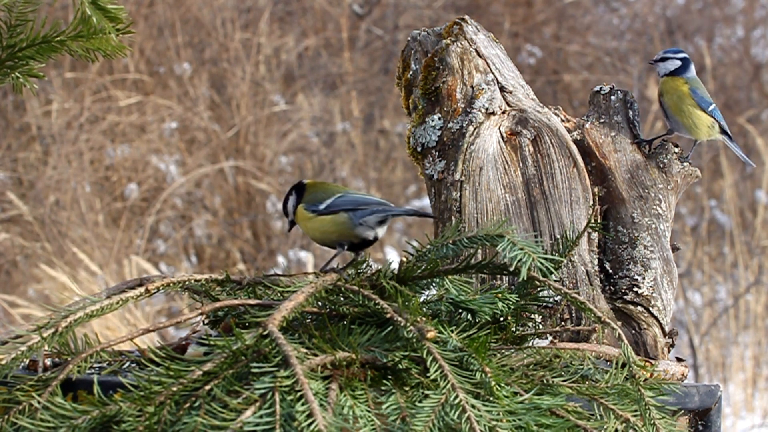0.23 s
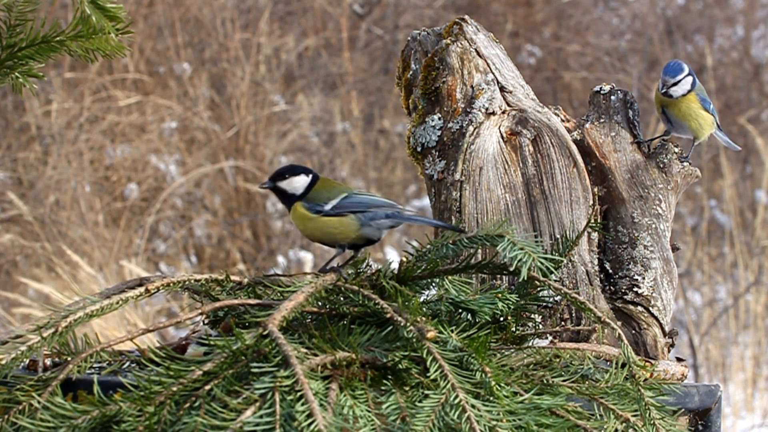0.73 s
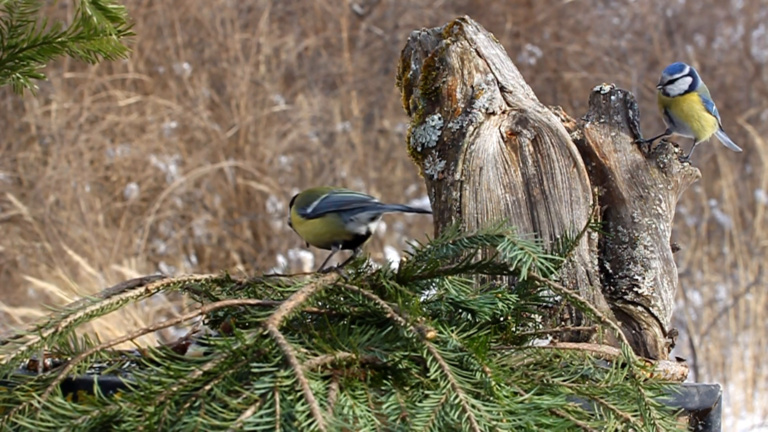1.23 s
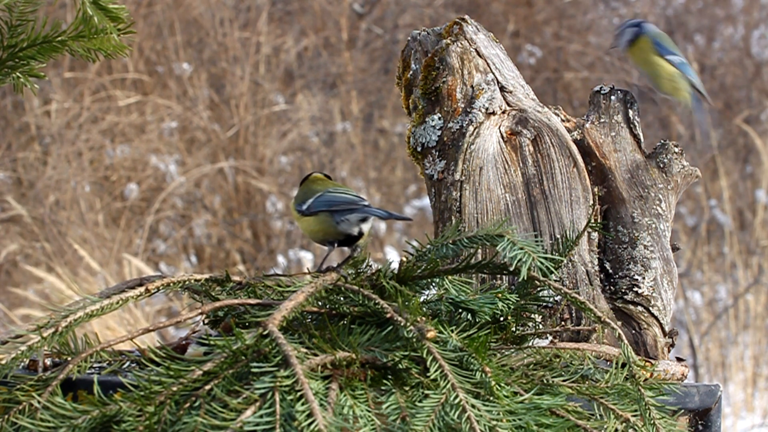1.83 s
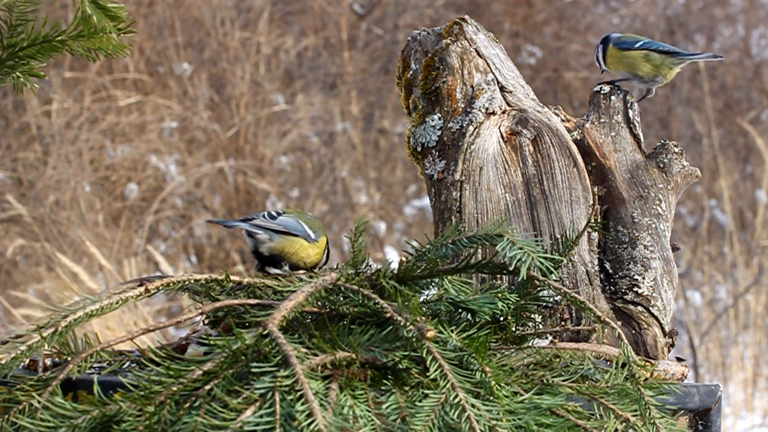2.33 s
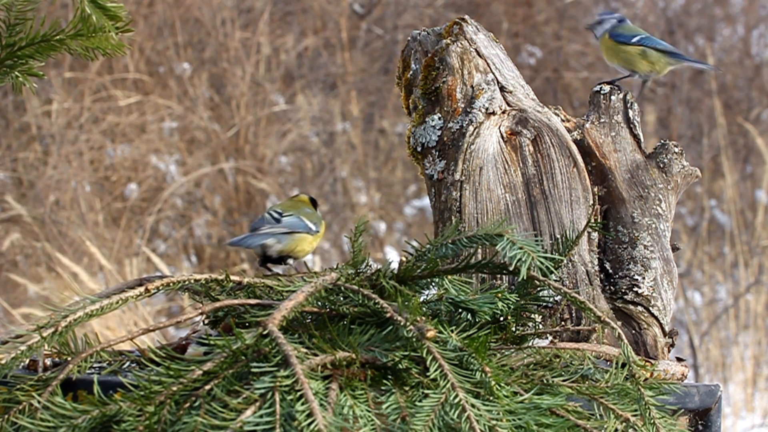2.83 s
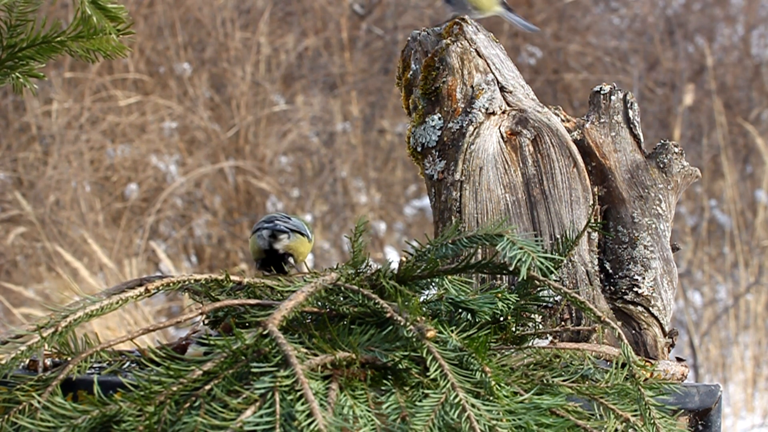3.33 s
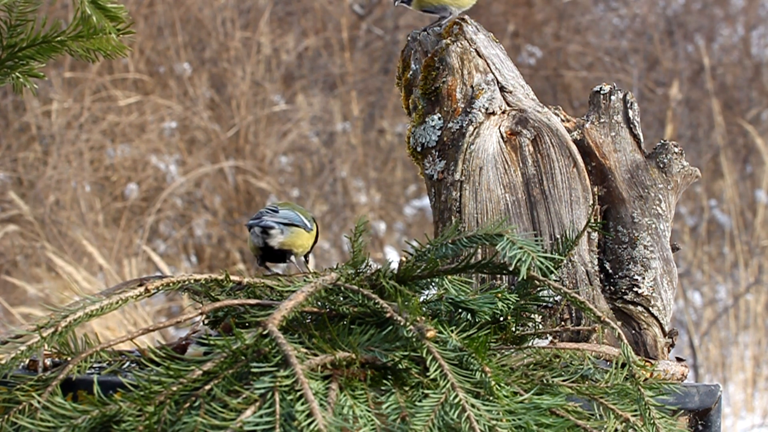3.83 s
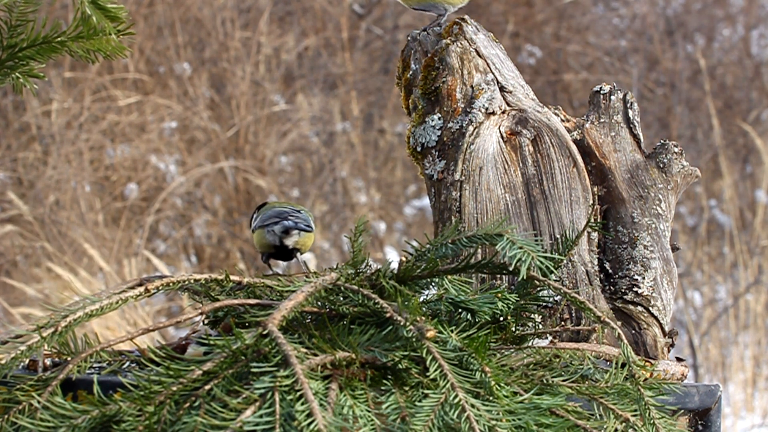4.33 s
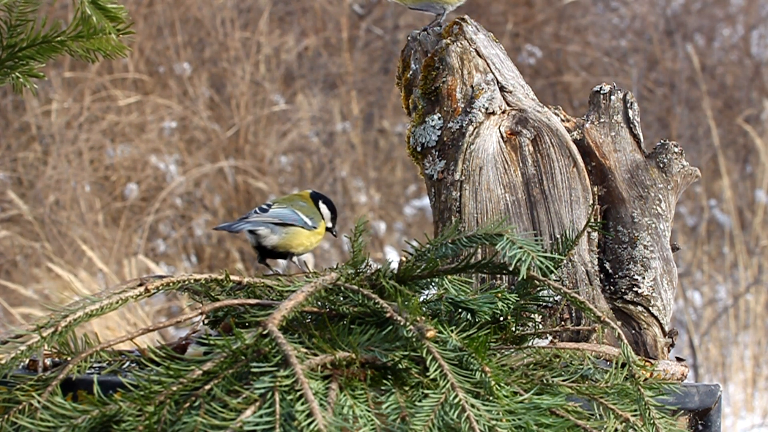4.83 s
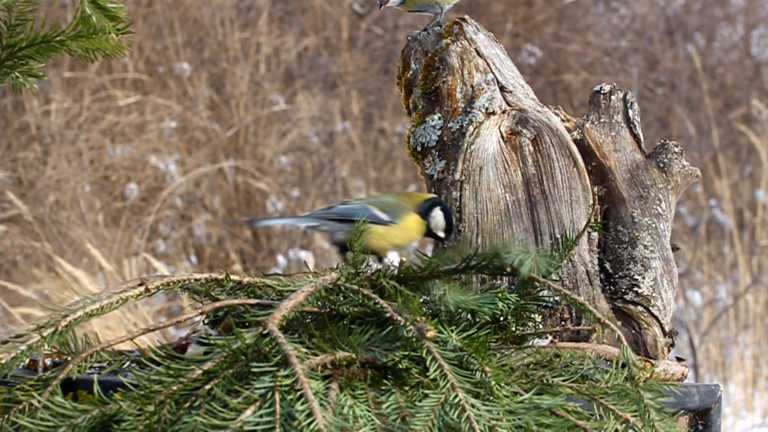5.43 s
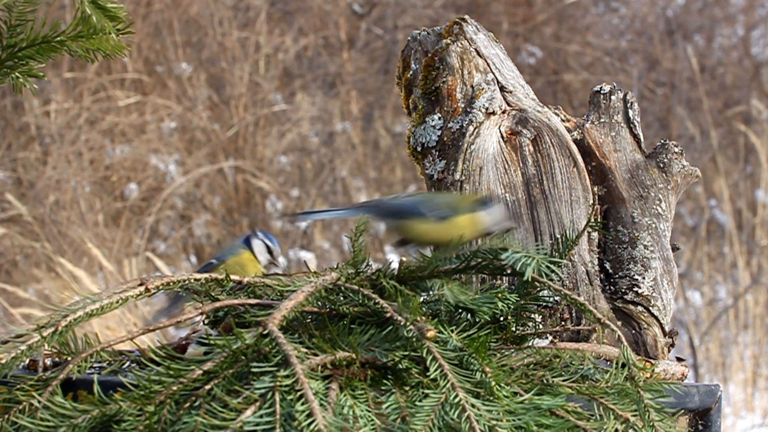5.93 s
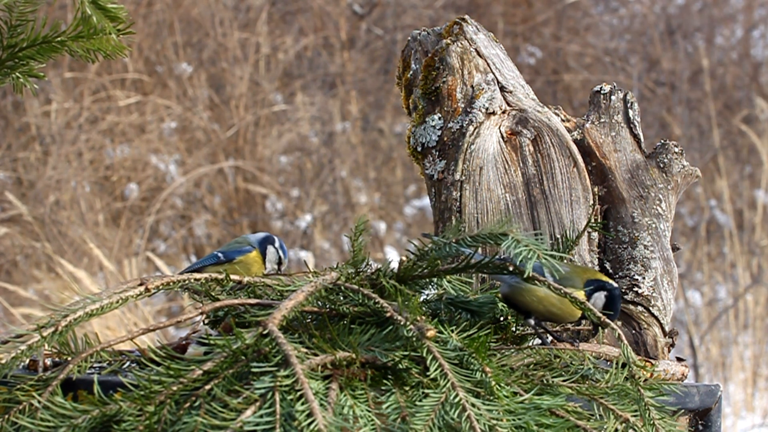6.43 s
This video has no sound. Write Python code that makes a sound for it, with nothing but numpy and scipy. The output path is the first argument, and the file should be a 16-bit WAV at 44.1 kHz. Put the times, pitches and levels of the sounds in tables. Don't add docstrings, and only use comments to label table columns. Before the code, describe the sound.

A quiet winter field, heard close to small feeding tits, with smooth steady microphone hiss and faint distant traffic rumble that swells slightly after 2 seconds. Two thin, high, wavering seeps come at 0.1 and 0.3 s. Two very short, bright chips, sweeping sharply upward, follow at 0.6 and 0.75 s, the second softer. From 1.2 to 2.9 s there are only tiny dry claw and beak ticks on bark and soft shuffles in needles, densest around 2.4-2.9. At 3.05-3.4 s a loud burst of four crisp chips leaves short smeared outdoor echoes; ticks follow at 3.5. Between 4.2 and 4.6 s four much fainter, turned-away chips sound diffuse, with a faint seep among them. A last weak chip comes near 5.2, then hop rustles and blurred distant whistles at 5.3-5.6. Sparse ticks lead to a clearer thin seep at 6.6 and a sharp final tick.

```python
import sys
import numpy as np
from scipy import signal
from scipy.fft import rfft, irfft
from scipy.io import wavfile
from scipy.ndimage import uniform_filter1d

SR = 44100
rng = np.random.default_rng(int(sys.argv[2]) if len(sys.argv) > 2 else 0)


def generate_wav(signal):
    frames = np.transpose(np.atleast_2d(signal))
    scaled = np.clip(frames, -1, 1) * 32767
    pcm = np.round(scaled).astype(np.int16)
    wavfile.write(sys.argv[1], SR, pcm)


N = 295470


def from_db(db):
    return 10 ** (np.asarray(db) / 20)


def rms_one(x):
    return x / np.sqrt(np.mean(x ** 2) + 1e-20)


def in_time(rows, t):
    s, *columns = np.transpose(rows)
    return [np.interp(t, s, c) for c in columns]


def drift(rate, size):
    r = np.exp(-2 * np.pi * rate / SR)
    noise = rng.standard_normal(size + 9000)
    return rms_one(signal.lfilter([1], [1, -2 * r, r * r], noise)[9000:])


def coloured(x, spectrum):
    hz, db = np.transpose(spectrum)
    f = np.arange(N // 2 + 1) * SR / N + 1
    weight_db = np.interp(np.log(f), np.log(hz), db, left=-90, right=-90)
    return rms_one(irfft(rfft(x) * from_db(weight_db), N))


def add(track, s, sound):
    i = round(s * SR)
    track[i:i + len(sound)] += sound[:N - i]


def background(t):
    # (time [s], level [dB])
    rumble_level = [
        (0, -75),
        (.9, -75),
        (2.5, -70),
        (3.1, -73.5),
        (3.6, -70),
        (4.1, -71.5),
        (4.8, -69.5),
        (6.7, -69.5),
    ]
    # (frequency [Hz], level [dB per Hz])
    rumble_spectrum = [(12, -51), (20, -21.5), (134, 0), (284, 0), (506, -2.5), (572, -3.5), (840, -11.5),
                       (1130, -16), (1300, -16.5), (1690, -42), (2860, -120)]
    # (frequency [Hz], level [dB per Hz])
    hiss_spectrum = [(590, -30), (1000, -8), (1340, -12), (1570, 1.5), (1770, -7.5), (2230, -8),
                     (2560, -6.5), (4520, -4), (7270, -1), (8650, -4), (13000, -5), (14400, -8),
                     (16000, -7)]
    hiss_base_db = -71
    gain_low_db, gain_back_s, gain_rise_s = -3.5, 1.86, 0.17

    rumble_db, = in_time(rumble_level, t)
    rumble_gain = from_db(rumble_db + 0.64 + 0.7 * drift(4.8, size=N))
    rumble = rumble_gain * coloured(rng.standard_normal(N), rumble_spectrum)
    hiss_db = hiss_base_db + gain_low_db / (1 + np.exp((t - gain_back_s) / gain_rise_s))
    hiss_gain = from_db(hiss_db + 5.0 + 0.54 * drift(11.0, size=N))
    return rumble + hiss_gain * coloured(rng.standard_normal(N), hiss_spectrum)


def rustle(t):
    # (time [s], level [dB], half length [s])
    shuffles = [
        (1.261, -68, 0.039),
        (1.793, -69, 0.056),
        (2.391, -61.5, 0.012),
        (2.53, -77, 0.033),
        (2.764, -77, 0.054),
        (4.7, -76, 0.12),
        (5.259, -63, 0.009),
        (5.365, -70, 0.039),
        (5.533, -73.5, .11),
    ]
    # (frequency [Hz], level [dB per Hz])
    needle_spectrum = [(1200, -10), (2200, 0.5), (4000, -1), (7000, -3), (11000, -1), (15000, -12.5)]
    rest_db = -75

    sizes = from_db(2.9 * np.minimum(rng.exponential(1, N), 4)) * rng.choice([-1, 1], N)
    snaps_per_s = 2200 * from_db(6.0 * drift(40, size=N))
    snaps = sizes * (rng.random(N) < snaps_per_s / SR)
    stir = from_db(rest_db)
    for s, db, half_s in shuffles:
        stir = stir + from_db(db) * np.exp(-((t - s) / half_s) ** 2)
    return stir * coloured(snaps, needle_spectrum)


def ticks():
    # (time [s], peak level [dB], ring frequency [Hz])
    impacts = [(0.0194, -43, 5740), (0.6502, -35, 10300), (0.7437, -43, 7150), (1.2421, -47, 4050),
               (1.47, -41.5, 1860), (1.783, -42, 2170), (1.9792, -40.5, 4900), (2.1374, -34, 4400),
               (2.3825, -40, 8510), (2.394, -36, 6750), (2.415, -38, 9810), (2.4668, -43, 1590),
               (2.5213, -34, 5600), (2.5498, -35.5, 2960), (2.74, -42.5, 8140), (2.8026, -39.5, 11000),
               (2.8499, -38.5, 7550), (2.8774, -39.5, 3040), (3.5187, -32, 11100), (3.558, -36.5, 5650),
               (5.2557, -36, 3980), (5.262, -44, 5410), (5.374, -37, 11500), (5.489, -42, 3910),
               (6.0114, -48, 1620), (6.1068, -44, 7590), (6.2013, -44, 9050), (6.501, -42.5, 3030),
               (6.5149, -38, 7730), (6.65, -26.5, 8100)]
    decay_ms = 1

    out, ms = np.zeros(N), np.arange(500) * 1000 / SR
    bark = signal.butter(2, [3300, 12500], "band", fs=SR, output="sos")
    fade = np.exp(-ms / decay_ms)
    for s, db, hz in impacts:
        ring = np.sin(2 * np.pi * hz * ms / 1000)
        scratch = signal.sosfilt(bark, rng.standard_normal(len(ms)))
        add(out, s, from_db(db - 7.0) * fade * (0.46 * ring + 0.62 * scratch))
    return out


def scatter(feed, echoes, tail_db):
    field_t60_s = 0.33
    ms = np.arange(SR // 2) * 1000 / SR
    shape = from_db(tail_db - 60 * ms / 1000 / field_t60_s) * (ms > 3) / np.sqrt(SR / 50)
    for delay_ms, smear_ms, db in echoes:
        smear = np.exp(-((ms - delay_ms) / smear_ms) ** 2)
        shape = shape + from_db(db) * smear / np.sqrt(smear_ms * SR / 1000)
    return signal.fftconvolve(feed, shape * rng.standard_normal(len(ms)))[:N]


def syrinx(hz, gap_hz, low_db, high_db, octave_db, half_db, rough_db):
    # (half pitch [dB], one and a half [dB], triple [dB])
    partial_db = (-12, -9, -5)
    half, one_half, twelfth = from_db(partial_db)
    size = len(hz)

    def phase(f):
        jitter = 1 + 0.0056 * drift(590, size=size)
        return np.cumsum(2 * np.pi * f * jitter / SR) + 2 * np.pi * rng.random()

    low, high = phase(hz), phase(hz + gap_hz)
    low_gain = from_db(low_db + rough_db * drift(180, size=size))
    high_gain = from_db(high_db + rough_db * drift(180, size=size))
    halves = from_db(half_db) * (half * np.sin(low / 2) + one_half * np.sin(3 * low / 2))
    overtones = low_gain * (np.sin(2 * low) + halves + np.sin(3 * low) * twelfth * (hz < 5300))
    overtones += 2.2 * high_gain * np.sin(low + high)
    patchy = from_db(octave_db + 2.5 * drift(300, size=size))
    return np.sqrt(2) * (low_gain * np.sin(low) + high_gain * np.sin(high) + patchy * overtones)


def far_notes():
    # (time [s], pitch [Hz], length [s], level [dB])
    whistles = [(3.24, 3840, 0.011, -61), (5.312, 5200, 0.017, -62), (5.359, 3880, 0.021, -61),
                (5.357, 5800, 0.018, -68), (5.39, 3800, 0.044, -69), (5.412, 3600, 0.036, -66),
                (5.407, 4930, 0.019, -64), (5.471, 4000, 0.027, -66), (5.5, 3780, .02, -70),
                (5.567, 4340, 0.014, -69), (5.837, 7240, 0.051, -69)]
    out = np.zeros(N)
    for s, hz, length_s, db in whistles:
        count = round(length_s * SR)
        note = syrinx(np.full(count, hz), 333, db - 6.0, db - 10.5, -40, -11, rough_db=6.0)
        add(out, s - length_s / 2, np.hanning(count) * note)
    return out


def seeps():
    # (crest time [s], level [dB], crest pitch [Hz], swing depth [1 = usual], lead-in [ms])
    seep_calls = [
        (.110, -45, 7940, 1.24, 54),
        (.283, -47, 7950, 0.96, 65),
        (4.277, -48, 7800, .9, 65),
        (6.613, -38.5, 7760, 1.08, 73),
    ]
    # (time from crest [ms], depth below crest [Hz], lower voice [dB], upper voice [dB])
    seep_shape = [
        (-70.5, -300, -7, -25),
        (-56, 700, -8, -18),
        (-33, 1213, -3, -4),
        (-24, 490, -1.5, -5),
        (-14, 442, 1.5, -4),
        (2.3, 10, 0.5, -3.5),
        (16, 893, 1.5, -3),
        (38, 1522, -1, -0.5),
        (62.5, 2146, -8, -9),
    ]
    full_lead_ms, shy_db_per_ms = 58, 1.8
    gap_start_hz, gap_hz_per_ms = 371, 2.83
    tail_ms, attack_ms, edge_ms = 61.3, 5.4, 9.2

    out = np.zeros(N)
    for s, db, crest_hz, depth, lead_ms in seep_calls:
        ms = np.arange(-lead_ms, tail_ms, 1000 / SR)
        below_hz, low_db, high_db = in_time(seep_shape, ms)
        hz = uniform_filter1d(crest_hz - depth * below_hz, size=220)
        shy_db = shy_db_per_ms * max(full_lead_ms - lead_ms, 0)
        level_db = db - shy_db * np.clip(-ms / 14.0, 0, 1)
        fades = np.minimum((ms + lead_ms) / attack_ms, (tail_ms - ms) / edge_ms)
        edges = np.clip(fades, 0, 1) ** 2
        gap_hz = gap_start_hz + gap_hz_per_ms * np.minimum(ms, 16)
        note = syrinx(hz, gap_hz, level_db + low_db - 5.5, level_db + high_db - 9.0,
                      octave_db=-29, half_db=6.6, rough_db=2.5)
        add(out, s - lead_ms / 1000, edges * note)
    return out


def chip_shape(ms, glide_ms):
    glide_start, glide_mid_ms = .41, -0.675
    attack_db_per_ms, sag_db_per_ms, release_db_per_ms, hold_ms = 5.5, 0.65, 3.5, 9
    upper_db, upper_late_db_per_ms, upper_joins_ms = -3, 3, 2.2
    overtone_db, rasp_db_per_ms, rasp_top_db, fade_db_per_ms = -22, 6, 13, 1.2

    share = glide_start + (1 - glide_start) / (1 + np.exp((glide_mid_ms - ms) / glide_ms))
    early, late = np.maximum(-ms, 0), np.maximum(ms, 0)
    low_db = -attack_db_per_ms * early - sag_db_per_ms * late
    low_db = low_db - release_db_per_ms * np.maximum(ms - hold_ms, 0)
    high_db = low_db + upper_db - upper_late_db_per_ms * np.clip(upper_joins_ms - ms, 0, 4.0)
    octave_db = overtone_db + np.minimum(rasp_db_per_ms * early, rasp_top_db) - fade_db_per_ms * late
    return share, low_db, high_db, octave_db


def chips():
    # (time [s], direct level [dB], top pitch [Hz], glide time [ms], throat-opening pitch [Hz])
    facing_chips = [
        (0.6062, -18.5, 7550, 1.87, 3670),
        (0.755, -21.5, 7250, 1.77, 5280),
        (3.0544, -16.5, 7180, 1.5, 4980),
        (3.1476, -16.5, 7330, 1.8, 4070),
        (3.2701, -17, 7200, 1.58, 5300),
        (3.4146, -17.5, 7280, 1.4, 5340),
    ]
    # (time [s], direct level [dB], top pitch [Hz], glide time [ms], far echoes [dB])
    away_chips = [
        (4.218, -53, 7040, 1.7, -25.5),
        (4.33, -50, 7040, 1.4, -25),
        (4.45, -48.5, 7100, 1.7, -25.5),
        (4.579, -48, 7120, 1.54, -26),
        (5.186, -56, 6640, 1.8, -37.5),
    ]
    # (low edge [Hz], high edge [Hz])
    hedge_band = (6300, 8300)
    # (level jump as throat opens, overtones, half-pitch rasp, croak), all in dB
    facing, turned = (5.5, 8.4, -20, -14.5), (2, 9, 3, -5)
    facing_echo_db, turned_open_hz = -19, 5600
    lead_ms, end_ms = 7, 17.5
    voice_gap_hz, gap_widens = 696, 1
    breath_db, halo_db, murmur_db = -46, -27, -35
    croak_ms, croak_before_ms, croak_db_per_khz = 2.6, 4.1, 7

    direct, feed = np.zeros((2, N))
    air = signal.butter(2, [2000, 15000], "band", fs=SR, output="sos")
    low_band = signal.butter(1, [150, 2000], "band", fs=SR, output="sos")
    hedge = signal.butter(3, hedge_band, "band", fs=SR, output="sos")
    calls = [tuple(row) + (row[1] + facing_echo_db,) + facing for row in facing_chips]
    calls += [tuple(row[:4]) + (turned_open_hz, row[4]) + turned for row in away_chips]
    for s, direct_db, top_hz, glide_ms, open_hz, echo_db, jump_db, bright_db, rasp_db, croak_db in calls:
        ms = np.arange(-lead_ms, end_ms, 1000 / SR)
        size = len(ms)
        share, low_db, high_db, octave_db = chip_shape(ms, glide_ms)
        hz = top_hz * share
        shut_db = jump_db * np.clip((open_hz - hz) / 250, 0, 1)
        half_db = rasp_db * np.clip(1 - ms / 4, .3, 1)
        call = syrinx(hz, voice_gap_hz * share ** gap_widens, low_db - shut_db, high_db - shut_db,
                      octave_db + bright_db + 0.78 * shut_db, half_db, rough_db=.4)
        call += from_db(breath_db + 1.0 * low_db) * signal.sosfilt(air, rng.standard_normal(size))

        cycles = np.cumsum(np.pi * hz * (1 + .08 * drift(400, size=size)) / SR)
        croak = sum(np.cos(k * cycles) * (.55 if k == 1 else 1) for k in range(1, 9)) / 2
        croak_db += croak_db_per_khz * (open_hz / 1000 - 5)
        call += from_db(croak_db) * np.exp(-((ms + croak_before_ms) / croak_ms) ** 2) * croak
        call += from_db(murmur_db) * signal.sosfilt(low_band, rng.standard_normal(size))
        call *= signal.windows.tukey(size, .3)

        start = s + ms[0] / 1000
        add(direct, start, from_db(direct_db - 4) * call)
        add(feed, start, from_db(echo_db - 2.5) * call * np.clip(ms / 1.3, .25, 1))
        halo = signal.sosfilt(air, rng.standard_normal(1500)) * np.hanning(1500) ** 2
        add(direct, s - .018, from_db(direct_db + halo_db) * halo)
    far_feed = signal.sosfilt(hedge, feed + 1e-18)
    return direct, far_feed + from_db(-11) * direct + from_db(-26) * feed


def scene():
    # (delay [ms], smear [ms], level [dB])
    field_echoes = [
        (9.1, 7.1, -33),
        (19.76, 6.3, -39),
        (37, 5.7, -29.5),
        (47, 6.3, -55),
        (62, 5.4, -44.5),
        (78, 8.2, -45),
    ]
    # (delay [ms], smear [ms], level [dB])
    stump_echo = (8, 4.9, -14)
    t = np.arange(N) / SR
    direct, feed = chips()
    thin, feet = seeps(), ticks()
    echoes = scatter(feed + from_db(-4) * thin + from_db(-5) * feet, field_echoes, tail_db=-19.5)
    dulled = signal.lfilter([.4, .4], [1, -.2], direct)
    echoes += scatter(dulled, [stump_echo], tail_db=-99)
    return (direct + thin + echoes + far_notes() + feet + rustle(t) + background(t))[None]


def treble_gate(mix):
    # (low edge [Hz], high edge [Hz], threshold [dB])
    gated_bands = [(13600, 14450, -80.6), (14450, 15150, -74), (15150, 15900, -64)]
    block = 1024
    spectrum, hz = rfft(mix), np.arange(N // 2 + 1) * SR / N

    def under(edge_hz):
        return np.clip((edge_hz - hz) / 160 + .5, 0, 1)

    out = irfft(spectrum * under(gated_bands[0][0]), N)
    block_index = (np.arange(N) + 25) // block
    for low_hz, high_hz, keep_db in gated_bands:
        band = irfft(spectrum * (under(high_hz) - under(low_hz)), N)
        loud = np.bincount(block_index, band ** 2) / block > from_db(2 * keep_db)
        gate = uniform_filter1d(loud[block_index] * 1., size=300)
        out += band * uniform_filter1d(gate, size=300)
    return out


def low_pass(x):
    return signal.sosfilt(signal.butter(12, 16460, fs=SR, output="sos"), x)


def record(dry):
    mix = treble_gate(dry[0])[None]
    return low_pass(mix)


dry = scene()
out = record(dry)
generate_wav(out)
```